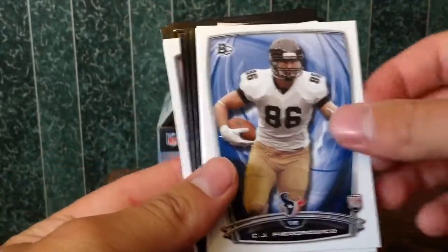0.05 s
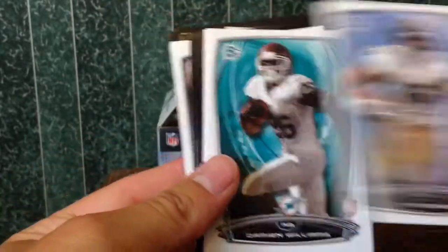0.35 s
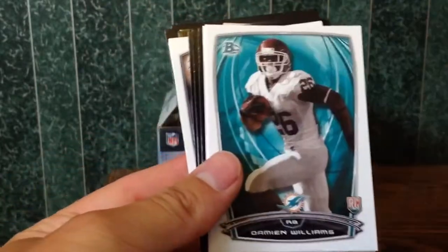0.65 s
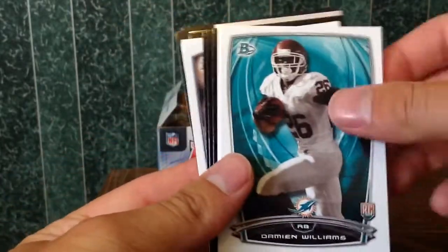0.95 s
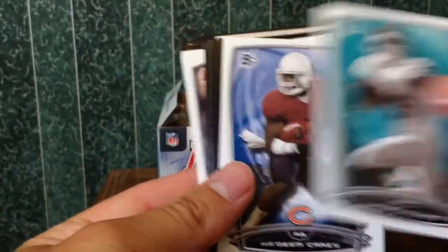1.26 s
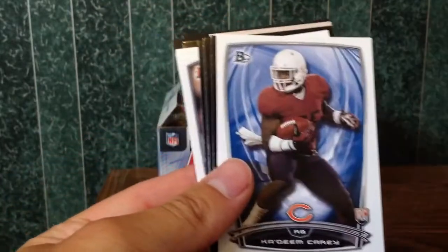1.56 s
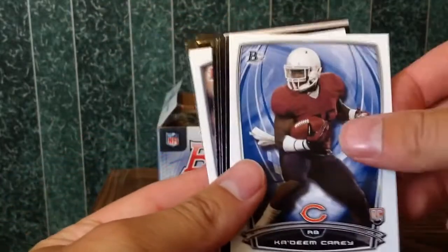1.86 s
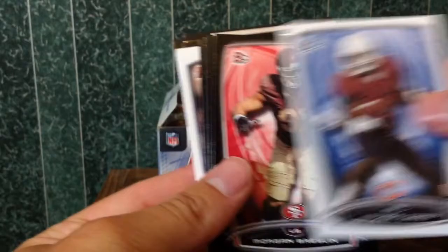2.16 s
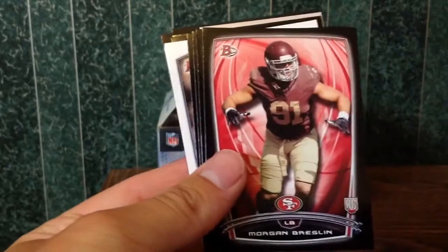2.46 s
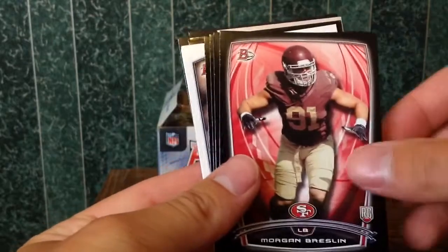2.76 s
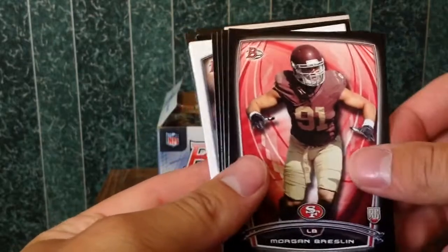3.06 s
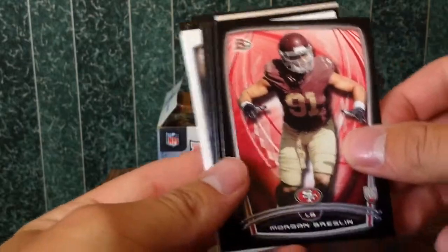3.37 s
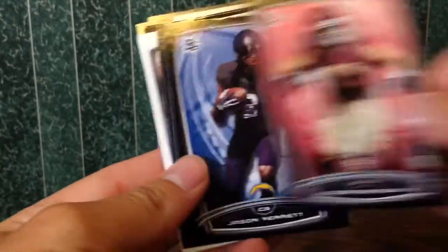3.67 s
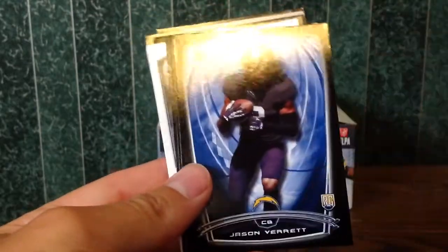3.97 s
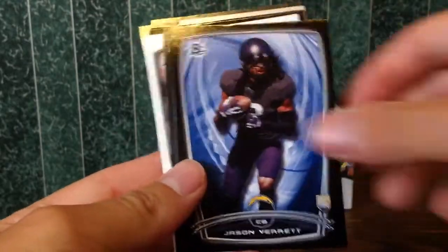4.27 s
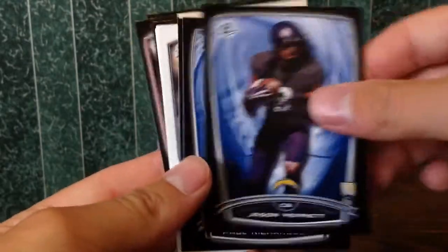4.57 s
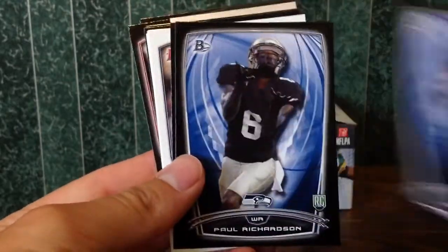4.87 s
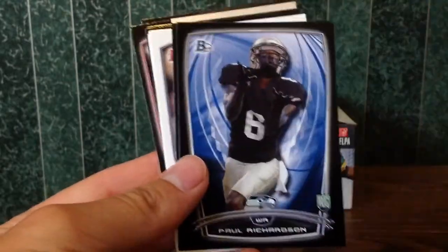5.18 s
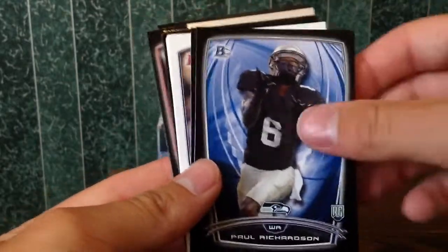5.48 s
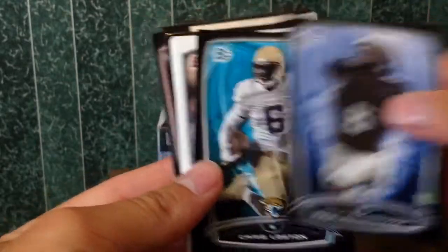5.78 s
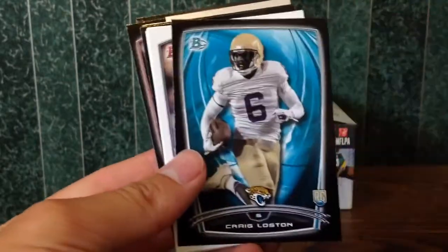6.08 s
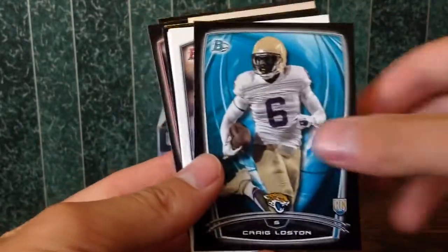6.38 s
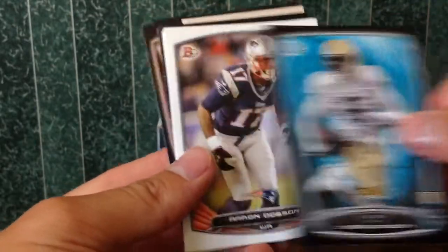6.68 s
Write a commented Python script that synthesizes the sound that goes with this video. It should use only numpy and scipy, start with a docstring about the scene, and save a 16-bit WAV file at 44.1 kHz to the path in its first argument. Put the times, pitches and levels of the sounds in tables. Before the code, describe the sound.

In a small room with a faint, steady fan hum, someone deals through a stack of glossy cards. Near the microphone each card slides free with a quiet swish and light finger ticks. Moments later its edge clicks on a wooden table and it slaps sharply onto a pile with a soft low thump. This happens six times at an easy pace, followed by one last swish.

```python
"""Stiff trading cards, thumbed off a hand-held stack and laid on a pile on a wooden table in a small room.
Close to the microphone each card hisses off the stack. A little further off it taps down on its edge,
scrapes past the fingertip and snaps flat, pushing out a soft thump of air that wakes the low room modes.
A fan hums faintly in the background."""
import sys
import numpy as np
from scipy import signal
from scipy.fft import rfft, irfft
from scipy.io import wavfile
from scipy.ndimage import uniform_filter1d

SR = 44100
rng = np.random.default_rng(int(sys.argv[2]) if len(sys.argv) > 2 else 0)


def waveform_to_disk(signal):
    """Save audio, clipped to [-1, 1], as 16-bit WAV at the path in sys.argv[1]."""
    frames = np.transpose(np.atleast_2d(signal))
    scaled = np.clip(frames, -1, 1) * 32767
    samples = np.round(scaled).astype(np.int16)
    wavfile.write(sys.argv[1], SR, samples)


N = 301203
TIME = np.arange(N) / SR

# a card is pulled off the stack: (start [s], clear of the stack [s], relative hiss at full speed [dB],
# rub offset from that [dB], edge rasp [dB], rasp swell [s])
PULLS = [(0.26, 0.415, -47.5, -11.5, -64, .01), (1.09, 1.354, -49, -15.5, -51.5, .007),
         (1.98, 2.297, -53, -11, -70, 0.0095), (3.575, 3.73, -51.5, -20, -54, 0.0098),
         (4.53, 4.84, -54, -7.5, -51.5, .006), (5.676, 5.8684, -51.5, -11, -40, 0.0025),
         (6.586, 6.768, -53, -3, -45.5, .012)]


def slides():
    """Close up, glossy faces hiss over each other, catching slightly; firmer pressure adds a lower rub."""
    # friction spectra of the hiss and the rub: (frequency [Hz], level [dB])
    hiss_spectrum = [(1500, -25), (3500, -10.5), (5000, -4), (7000, 1), (9000, -1.5), (12000, 3.5),
                     (14500, 1.5), (16000, -0.5)]
    rub_spectrum = [(120, -27), (260, 3), (500, -3), (1000, 0.5), (1800, -4.5), (3000, -5.5), (5000, -5.5),
                    (10000, -20)]
    # a finger or a loose card brushes a glossy face:
    # (start [s], length [s], relative hiss [dB], rub offset from that [dB])
    brushes = [(0.172, 0.12, -48.5, -11.5), (0.533, .08, -56, -13), (1.054, 0.16, -59, -16),
               (1.82, .065, -60, -0.5), (2.025, 0.091, -56, -17), (3.896, .08, -59.5, -4),
               (4.532, 0.14, -59, -15), (4.848, 0.081, -55, -17), (4.998, 0.15, -57, -10),
               (5.448, .05, -60, -3), (5.557, 0.21, -56, -21), (5.893, 0.066, -57, -14),
               (6.533, 0.086, -55, -15)]
    ease_s, release_s, brush_attack_s = .013, 0.017, 0.021
    hiss, rub = np.zeros(N), np.zeros(N)
    for start, clear, db, rub_db, _, _ in PULLS:
        # the hand speeds the card up evenly until just before it comes free
        fastest = clear - ease_s
        speed = np.clip((TIME - start) / (fastest - start), 0, 1)
        contact = np.exp(-np.maximum(TIME - fastest, 0) / release_s)
        hiss += undb(db) * contact * speed ** 1.2  # friction grows as a power of speed
        rub += undb(db + rub_db) * contact * speed ** 1.4
    for start, length, db, rub_db in brushes:
        # a brush sets in quickly, then slows to rest
        attack = np.clip((TIME - start) / brush_attack_s, 0, 1)
        fade = np.clip((start + length - TIME) / (length - brush_attack_s), 0, 1) ** 0.91
        hiss += undb(db) * attack * fade
        rub += undb(db + rub_db) * attack * fade
    grip = undb(1.5 * waver(rate_hz=250) + .8 * waver(rate_hz=25))
    hiss = convolve(hiss * grip * friction(N, grain_db=3), body(hiss_spectrum))
    rub = convolve(rub * grip * friction(N, grain_db=6.5), body(rub_spectrum))
    # a reflection from the moving hand shifts the colour of the hiss
    delay_s = 0.000267 * undb(2.8 * waver(rate_hz=7))
    reflection = .25 * np.interp(TIME - delay_s, TIME, hiss)
    return undb(-0.75) * (hiss + reflection) + rub


def card_edges():
    """Near the microphone, each trailing edge rasps off the stack and edges tick against the fingers."""
    # ring of the card's free edge: (frequency [Hz], width [Hz], level [dB])
    edge_modes = [(290.1, 95, -4), (597, 300, -7), (976, 200, -6), (1580, 200, 0), (1930, 160, -2.5),
                  (2512, 90, 2.5), (3380, 100, -7), (3980, 120, 0), (5010, 200, -4.5), (7500, 7800, -12.5)]
    # fingers catch an edge: (time [s], level [dB], centre [Hz])
    catches = [(0.031, -53.5, 8000), (0.462, -54, 12000), (0.9243, -44.5, 1000), (0.946, -51.5, 3000),
               (0.971, -55, 4000), (1.263, -41, 8500), (1.8358, -60, 4000), (1.9010, -51.5, 9000),
               (2.27, -52, 328), (3.0210, -56, 9000), (5.4540, -52.5, 3000), (6.4300, -49.5, 7000)]
    rasps, ticks = np.zeros(N), np.zeros(N)
    for _, clear, _, _, db, swell in PULLS:
        add(rasps, *burst(clear, db, swell, fade=.004))
    for s, db, hz in catches:
        start, slips = burst(s, db, swell=0.00014, fade=0.0023)
        add(ticks, start, signal.fftconvolve(slips, body(modes=[(hz, 1.24 * hz, 0)])))
    return convolve(rasps, body(modes=edge_modes)) + ticks


def landings(bend_db):
    """At the pile, each bent card skids and snaps flat through its resonances, offset by bend_db."""
    # broad spectrum of the card: (frequency [Hz], level [dB])
    card_spectrum = [(45, -36.5), (100, -11.5), (300, 2.5), (600, 2), (1000, -4), (2500, -7.5),
                     (5000, -1.5), (8000, -2), (12000, -3), (16000, -6.5)]
    # each grip bends the card differently, one list a landing: (frequency [Hz], width [Hz], level [dB])
    bend_modes = [
        [(1150, 330, 11), (1420, 150, 15.5), (3740, 1600, 4.5), (6460, 900, 3), (10600, 700, 2)],
        [(1090, 180, 9), (1740, 740, 5.5), (4400, 900, 6.5), (6480, 1100, 9), (10000, 1200, 2)],
        [(1050, 240, 4), (1390, 420, 9), (2000, 200, -8), (3700, 1000, 4.5), (6200, 1200, -7)],
        [(705, 550, 7.5), (1410, 200, 9), (3900, 1250, 10), (6600, 480, 10.5), (8520, 340, 15.5),
         (11200, 310, 5), (14500, 1200, -4)],
        [(670, 88, 9.5), (1080, 200, -1), (1530, 340, 10.5), (2590, 510, 6.5), (3300, 320, 11), (4730, 600, 10),
         (8500, 460, 2), (11200, 960, 5.5)],
        [(1560, 230, 1.5), (3000, 450, 9.5), (3680, 320, 11.5), (6200, 800, -10)],
    ]
    # the card skids as it is pressed down:
    # (start [s], end [s], first level [dB], last level [dB], tilt [dB/octave])
    skids = [(0.5865, 0.602, -34.5, -39, 1), (1.517, 1.5334, -34.5, -26.5, -1),
             (2.416, 2.461, -43, -39, -2.5), (3.9480, 3.963, -43.5, -36, -2.5),
             (5.072, 5.084, -32.5, -30, -1.5), (6.063, 6.078, -43, -38, -3)]
    # it slips off the fingertip and slaps flat:
    # (time [s], level [dB], swell [s], fade [s], tilt [dB/octave])
    snaps = [(0.5891, -23.5, 0.0007, 0.0012, -3), (0.6082, -27, 0.000081, 0.00071, 0),
             (1.5166, -27, 0.00014, 0.00097, 3), (1.5290, -18.5, 0.00073, .0012, 0),
             (1.5322, -5, 0.000061, .0005, 2.5), (2.448, -31, .0006, .003, 0.5),
             (2.4553, -37, 0.00029, 0.0012, 4.5), (3.9448, -36.5, 0.000079, 0.0014, 4.5),
             (3.9636, -19.5, 0.00079, 0.00085, 0.5), (3.9647, -18.5, 0.0003006, .002, 0),
             (5.0757, -23.5, .0005, 0.0012, -1), (5.0792, -17, .0009, .0012, 0.5),
             (6.065, -37, 0.00041, 0.0013, 4), (6.0742, -29.3, .001, 0.0013, -1.5)]
    out = np.zeros(N)
    skid_starts = np.array(skids)[:, 0]
    bends = [[(hz, width, db + bend_db) for hz, width, db in bend] for bend in bend_modes]
    for (start, end, first_db, last_db, tilt_db), bend in zip(skids, bends):
        count = max(int((end - start) * SR), 20)
        skid = friction(count, grain_db=-8.5) * undb(np.linspace(first_db, last_db, count))
        add(out, start, signal.fftconvolve(skid, body(card_spectrum, bend, tilt_db)))
    for s, db, swell, fade, tilt_db in snaps:
        start, slips = burst(s, db, swell, fade)
        bend = bends[np.argmin(abs(skid_starts - s))]
        add(out, start, signal.fftconvolve(slips, body(card_spectrum, bend, tilt_db)))
    return out


def taps():
    """A card's edge chatters on the table and bounces once; the wood answers with a dispersed knock."""
    # the edge meets the table: (time [s], relative level [dB], tilt [dB/octave], bounce re tap [dB])
    strikes = [(0.5079, -45.5, -3, -20), (0.5705, -31, -1, -12), (1.4796, -29, 0.1, -0.5),
               (2.4109, -29.5, 2, -2.5), (3.9099, -35, -1.5, -15.5), (5.0334, -35, -1, 1),
               (6.0262, -31, 0.8, -10)]
    # table and card ring together: (frequency [Hz], width [Hz], level [dB])
    table_modes = [(187, 46, -4.5), (410, 125, -2.5), (530, 110, 1), (787, 150, -5), (1060, 120, -6),
                   (1420, 140, -5), (2004, 170, -4), (3160, 300, -12.5), (3470, 150, -9.5),
                   (3970, 220, -13.5), (5760, 600, -16.5), (7650, 900, -26), (11980, 5500, -28.5)]
    bounce_s, tap_chatter_s, bounce_chatter_s = .0138, 0.0024, 0.0037  # the looser bounce chatters longer
    out = np.zeros(N)
    t = np.arange(int(.02 * SR)) / SR
    for s, db, tilt_db, bounce_db in strikes:
        table = disperse(body(modes=table_modes, tilt_db=tilt_db), lag_s=0.001196)
        for delay, offset_db, chatter in [(0, 0, tap_chatter_s), (bounce_s, bounce_db, bounce_chatter_s)]:
            contact = 0.14 * rng.standard_normal(len(t)) * np.exp(-t / chatter)
            contact[0] += 1  # the impact itself
            knock = signal.fftconvolve(contact, table)
            add(out, s + delay - .0004, undb(db + offset_db + 20.5) * knock / np.linalg.norm(knock))
    return out


def thumps():
    """Air squeezed from under a falling card gives one pressure swing; the low room modes ring on."""
    # puffs of air: (time [s], level [dB], frequency [Hz])
    puffs = [(0.6140, -22, 288), (1.5354, -24.5, 278), (2.462, -26, 240), (3.9683, -30, 290),
             (5.087, -31.5, 226), (6.0822, -33, 243)]
    # low room modes: (frequency [Hz], t60 [s], level re puff [dB])
    room_modes = [(124.2, 0.2397, -20.5), (138.4, 0.14, -14), (165, 0.3, -17.5), (213, 0.46, -23),
                  (245, 0.25, -15), (310.5, .22, -17)]
    out = np.zeros(N)
    lead_s, build_up_s = .012, 0.0059
    t = np.arange(SR // 2) / SR - lead_s
    boom = sum(undb(db) * np.exp(-np.log(1000) * t / t60) * np.cos(2 * np.pi * hz * t)
               for hz, t60, db in room_modes)
    boom *= np.clip(t / build_up_s, 0, 1)
    for s, db, hz in puffs:
        puff = np.exp(-(t / 0.003) ** 2) * np.cos(2 * np.pi * hz * t)
        add(out, s - lead_s, -undb(db) * (puff + boom))
    # so small a surface radiates hardly any deep bass
    return signal.sosfiltfilt(signal.butter(3, 93, "high", fs=SR, output="sos"), out)


def room(t60_low, t60_high, tail_db):
    """The small room at the microphone: near reflections and a short tail whose treble dies first."""
    # reflections off near surfaces: (delay [s], level [dB])
    echoes = [(.0093, -15), (0.011, -18.5), (0.0208, -25.5)]
    # colour the walls give the tail: (frequency [Hz], level [dB])
    wall_spectrum = [(100, -13), (400, -4.5), (1200, -9.5), (2500, 1.5), (4000, 0.5), (7000, -0.5),
                     (11000, -1), (16000, -3.5)]
    t = TIME[:SR // 2]
    build_up = np.clip(t / 0.0094, 0, 1)
    noise = rng.standard_normal(len(t)) * build_up * np.exp(-np.log(1000) * t / t60_low)
    diffuse = convolve(even(noise, width_hz=160) * (t < t[-1] - .05), body(wall_spectrum))
    low = signal.sosfilt(signal.butter(2, 6000, fs=SR, output="sos"), diffuse)
    tail = low + (diffuse - low) * np.exp(-np.log(1000) * t * (1 / t60_high - 1 / t60_low))
    response = undb(tail_db) * tail / np.linalg.norm(tail)
    for delay, db in echoes:
        add(response, delay, undb([db]))
    return response


def fan():
    """In the background, a steady rush of air with faint, slightly wavering shaft harmonics."""
    # hum: (harmonic [multiple of the shaft rate], level [dB])
    harmonics = [(3, -75), (4, -75), (5, -75.5), (9, -75.5), (13, -79), (18, -87.5)]
    # rush of air: (frequency [Hz], relative level [dB])
    air_spectrum = [(18, -79.5), (30, -55.5), (123, -12.5), (187, -10), (225, -0.5), (324, -7.5), (350, -4),
                    (389, -9), (443, -5), (673, -7.5), (808, -7.5), (1870, -16.5), (2180, -17), (2550, -19),
                    (15500, -23.5)]
    shaft_hz, air_db = 89.1, -61
    knots = np.arange(0, N / SR + 1, .25)
    drift = np.interp(TIME, knots, rng.standard_normal(len(knots)))
    angle = 2 * np.pi * np.cumsum(shaft_hz * (1 + .002 * drift)) / SR
    hum = sum(np.sqrt(2) * undb(db) * np.sin(k * angle + 2 * np.pi * rng.random()) for k, db in harmonics)
    rush = signal.fftconvolve(rng.standard_normal(N + SR), body(air_spectrum))[SR:SR + N]
    return hum + undb(air_db) * unit(rush)


def friction(count, grain_db):
    """Dense micro-slips of uneven size."""
    sizes = undb(grain_db * rng.standard_normal(count))
    return unit(rng.standard_normal(count) * np.sqrt(uniform_filter1d(sizes ** 2, size=8) + 1e-18))


def burst(s, db, swell, fade):
    """A rush of slips that builds up to time s and dies away: returns (start [s], sound)."""
    lead = 5 * swell
    t = np.arange(-lead, 6 * fade, 1 / SR)
    envelope = np.exp(np.minimum(t / swell, -t / fade))
    slips = even(rng.standard_normal(len(t)) * envelope, width_hz=700)
    return s - lead, undb(db) * slips * np.linalg.norm(envelope) / np.linalg.norm(slips)


def body(points=None, modes=(), tilt_db=0, size=4096):
    """Causal response of unit energy from a broad spectrum, resonances on top and a tilt per octave."""
    hz = np.maximum(np.fft.rfftfreq(size, 1 / SR), 10)
    power = sum(undb(2 * db) / (1 + ((hz ** 2 - f ** 2) / (hz * width)) ** 2) for f, width, db in modes)
    if points is not None:
        f, db = np.transpose(points)
        power = power + undb(2 * np.interp(np.log(hz), np.log(f), db))
    cepstrum = irfft(np.log(np.sqrt(power) * undb(tilt_db * np.log2(hz))))
    folded = 2 * cepstrum[:size // 2] * (np.arange(size // 2) > 0)  # minimum phase
    response = irfft(np.exp(rfft(folded, size)))
    return response / np.linalg.norm(response)


def disperse(response, lag_s):
    """Bending waves carry the treble first; lag_s is the travel time at 1 kHz."""
    hz = np.fft.rfftfreq(len(response), 1 / SR)
    travel = np.exp(-4j * np.pi * lag_s * np.sqrt(1000 * hz))
    return irfft(rfft(response) * travel)


def waver(rate_hz):
    """Smooth random drift of about unit spread."""
    return np.interp(TIME * rate_hz, np.arange(N), rng.standard_normal(N))


def even(x, width_hz):
    """Flatten the broad colour of a noise, keeping its fine grain."""
    spectrum = rfft(x)
    power = uniform_filter1d(abs(spectrum) ** 2, size=max(int(width_hz * len(x) / SR), 1))
    return unit(irfft(spectrum / np.sqrt(power + 1e-18), len(x)))


def undb(db):
    """Decibels to gain."""
    return 10 ** (np.asarray(db) / 20)


def unit(x):
    """Scale to rms 1."""
    return x / np.sqrt(np.mean(x ** 2))


def convolve(x, response):
    """Pass a sound through a response, keeping its length."""
    return signal.fftconvolve(x, response)[:len(x)]


def add(out, s, sound):
    """Mix a sound in at time s."""
    start = int(s * SR)
    out[start:start + len(sound)] += sound[:len(out) - start]


def scene():
    """One microphone, close to the held stack; the pile lies further off and carries more of the room."""
    held = slides() + card_edges()
    tapped, landed, air = taps(), landings(bend_db=-0.5), thumps()
    sides = [room(t60_low=0.23, t60_high=0.16, tail_db=-8.5) for _ in range(3)]
    reverb = convolve(undb(-5.5) * held + undb(1.0) * tapped + undb(-6.0) * air, sides[0])
    # the room hears the card from all sides, which evens out its resonances
    landing_reverb = sum(convolve(landings(bend_db=-7.5), side) for side in sides) / np.sqrt(len(sides))
    return (held + tapped + landed + air + reverb + undb(-.7) * landing_reverb + fan())[None]


def record(dry):
    """The recorder thins the deep bass and cuts the top."""
    low_cut_hz, top_hz = 30, 15600
    thin = signal.sosfilt(signal.butter(1, low_cut_hz, "high", fs=SR, output="sos"), dry)
    return signal.sosfilt(signal.ellip(10, .2, 70, top_hz, fs=SR, output="sos"), thin)


dry = scene()
out = record(dry)
waveform_to_disk(out)
```